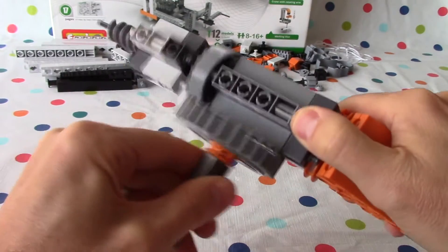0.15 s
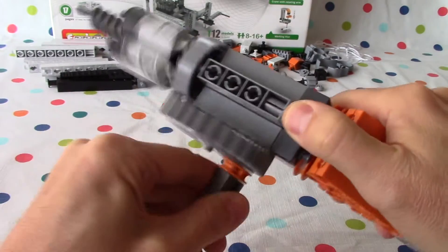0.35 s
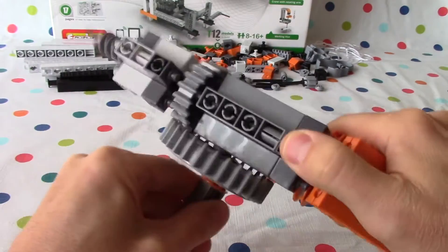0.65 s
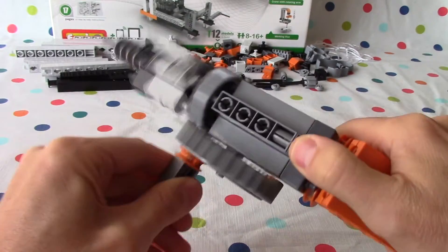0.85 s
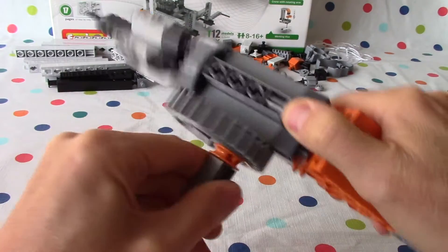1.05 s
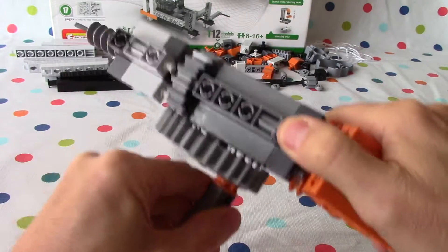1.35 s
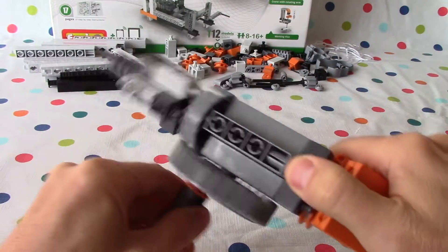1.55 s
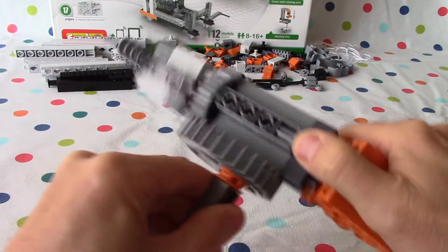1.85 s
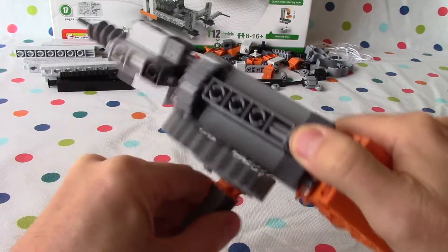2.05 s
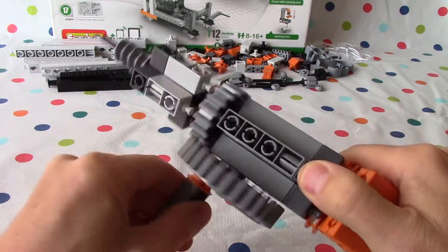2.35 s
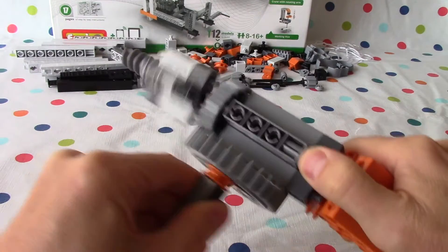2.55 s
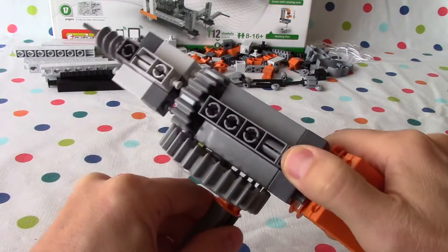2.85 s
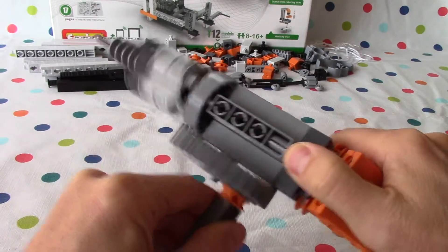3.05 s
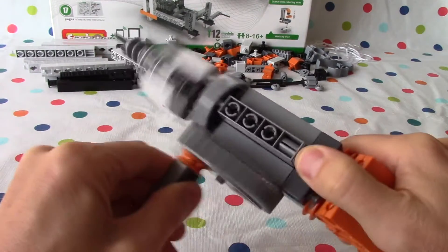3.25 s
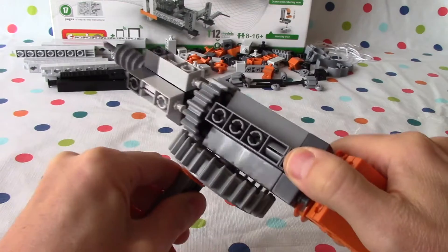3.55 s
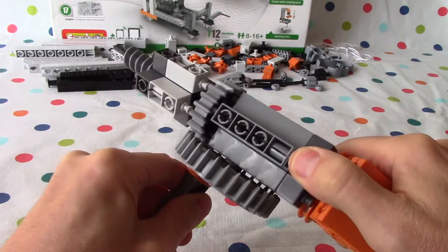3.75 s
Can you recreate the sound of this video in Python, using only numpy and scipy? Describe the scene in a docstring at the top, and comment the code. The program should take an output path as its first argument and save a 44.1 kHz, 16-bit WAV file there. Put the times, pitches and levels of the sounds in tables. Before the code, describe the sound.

Plastic toy gears click and rasp under a hand crank, close to the microphone in a small room. Light clicks start near 0.15 s, then dense, uneven clusters of bright, hollow snaps and short scrapes run from 0.55 to 2.75 s with brief gaps. After a short rest with a faint tick, another burst runs from 3.0 to 3.35 s. Quiet low hum remains, with a tiny high tick near 3.75 s.

```python
"""A hand turns the crank of a plastic toy gearbox in uneven strokes, close by in a small room.
Teeth rasp in runs of tiny impacts and sliding noise, and snap free with clicks of a few quick bounces.
Each contact rings the hollow plastic: a sharp edge, a fast-dying noise and a set of ringing tones.
While the gears rest, a small part ticks faintly in two high tones.
Beneath lie a low hum of shaped noise with a faint steady tone, and the room's short, dull answer."""
import sys
import numpy as np
from scipy import signal
from scipy.fft import rfft, irfft, next_fast_len
from scipy.io import wavfile
from scipy.ndimage import map_coordinates

SR = 44100
rng = np.random.default_rng(int(sys.argv[2]) if len(sys.argv) > 2 else 0)


def unload_wav(signal):
    """Save mono or channel-first audio to the path in sys.argv[1] as 16-bit WAV at rate SR, clipped to [-1, 1]."""
    wavfile.write(
        sys.argv[1],
        SR,
        np.round(np.clip(np.atleast_2d(signal).T, -1, 1) * 32767).astype(np.int16),
    )


N = 171990

# runs of teeth scraping: start [t/s], length [t/s], level [level/dB],
# bass shelf [level/dB], treble shelf [level/dB]
TOOTH_RASPS = [(0.142, 0.026, -46.5, -18.5, 7.5), (0.171, 0.028, -36, -30, 0), (0.262, 0.043, -44, 1, 0),
               (0.311, 0.018, -29, -7, 5), (0.346, 0.036, -31.5, -1, -1.5), (0.549, 0.04, -25.5, 8, 2),
               (0.675, 0.089, -37.5, 0, 3.5), (0.78, 0.043, -32, 0, 0.5), (0.833, 0.022, -29.5, -4, 1.5),
               (0.895, 0.074, -42, 1, 0), (0.947, 0.054, -36.5, -12, 1), (1.008, 0.052, -28.5, -14, -0.5),
               (1.087, 0.03, -32.5, -9.5, -2.5), (1.242, 0.035, -23.5, 1, 1), (1.411, 0.026, -33, -7, -5),
               (1.436, 0.037, -24, 12, 2.5), (1.478, 0.052, -30.5, 4.5, 3), (1.632, 0.017, -35.5, -23, 2),
               (1.657, 0.066, -40, -2, -3), (1.723, 0.018, -26, -18, 0.5), (1.78, 0.026, -29.5, -3, -1),
               (1.81, 0.12, -40, -15.5, 1.5), (1.845, 0.016, -28.5, -15, 2.5),
               (1.924, 0.053, -32.5, -10.5, -1), (1.984, 0.042, -28, 7, -2.5),
               (2.041, 0.061, -32.5, 8.5, -3), (2.211, 0.032, -36.5, 3.5, 1.5), (2.235, 0.031, -21, 8, 6),
               (2.275, 0.029, -30.5, 1, -0.5), (2.45, 0.15, -35, -13.5, -1), (2.597, 0.018, -27, -21, 4),
               (2.626, 0.083, -27.5, -7, 1), (2.724, 0.028, -30, 0, 1.5), (2.993, 0.029, -38, -5, 1.5),
               (3.016, 0.046, -26.5, -17, -1.5), (3.062, 0.059, -26.5, -30, 0),
               (3.132, 0.033, -30, -17.5, -2.5), (3.169, 0.023, -42.5, -5.5, 4),
               (3.239, 0.05, -32.5, -4, -2.5), (3.285, 0.03, -29, -3.5, -4), (3.316, 0.0274, -24.5, 3.5, 1)]
# a tooth snaps free and chatters in its play: start [t/s], level [level/dB], strongest resonance [f/Hz]
TOOTH_CLICKS = [(0.155, -35.5, 3760), (0.194, -39, 1500), (0.238, -36, 1480), (0.304, -31.5, 3600),
                (0.351, -28.5, 1810), (0.37, -26, 3080), (0.395, -28.5, 912), (0.538, -38.5, 3060),
                (0.561, -20, 3400), (0.571, -17.5, 1060), (0.587, -23, 1076), (0.641, -27.5, 2400),
                (0.682, -27.5, 3430), (0.693, -25.5, 980), (0.716, -23.5, 3500), (0.735, -34, 4100),
                (0.745, -21.5, 2350), (0.795, -20.5, 2420), (0.818, -30.5, 940), (0.87, -33, 1620),
                (0.931, -28.5, 3530), (0.96, -24, 2950), (0.982, -32, 960), (1.011, -21, 1600),
                (1.028, -22.5, 1610), (1.113, -27.5, 3000), (1.229, -40, 5540), (1.257, -16, 3360),
                (1.277, -24.5, 5900), (1.297, -35.5, 4250), (1.334, -38.5, 940), (1.415, -32, 3130),
                (1.438, -20, 2840), (1.471, -18.5, 5650), (1.51, -22, 2400), (1.558, -37, 3530),
                (1.581, -27, 5570), (1.687, -36.5, 1700), (1.728, -23, 2950), (1.745, -27.5, 2480),
                (1.781, -23, 6400), (1.86, -29, 1160), (1.903, -27, 1590), (1.943, -22, 4930),
                (1.96, -19.5, 3000), (1.993, -25, 3040), (2.014, -22.5, 730), (2.048, -22, 3070),
                (2.062, -25, 1110), (2.075, -19, 3300), (2.094, -23.5, 5700), (2.241, -20, 5800),
                (2.265, -15, 1810), (2.283, -25, 1630), (2.307, -25.5, 1860), (2.43, -29, 2840),
                (2.469, -30, 1330), (2.517, -26, 2900), (2.556, -24.5, 1850), (2.607, -25, 1700),
                (2.652, -19.5, 3220), (2.744, -23.5, 1124), (2.962, -47, 1710), (3.033, -24.5, 2380),
                (3.056, -24, 2150), (3.095, -30, 1560), (3.11, -28, 6800), (3.133, -23.5, 2420),
                (3.222, -26.5, 4800), (3.289, -26.5, 935), (3.322, -22, 5780), (3.339, -23.5, 2620),
                (3.432, -55, 1236)]

BASS_HZ, TREBLE_HZ = 606, 3900  # corners of the bass and treble shelves
RING_DB, RING_SCATTER_DB = -9, 0.5  # ringing tones against the crack; their scatter from spot to spot
SNAP_DB = -19.5  # the first sharp edge against the crack
DETUNE = 0.021  # random spread of the ringing tones from contact to contact, as a share of pitch
RESONANCE_DB, RESONANCE_WIDTH = 9.5, 0.053  # strongest resonance; half width as a share of its pitch
RIPPLE_DB, RIPPLE_PER_OCTAVE = 3, 4.415  # peaks and dips that differ from spot to spot
RING_SIZE = 4096  # samples in one contact

IMPACTS_PER_S, SIZE_SCATTER_DB = 300, 3  # typical rate within a rasp; scatter of the impact sizes
UNEVEN, SWELL_DB = .3, 1  # scatter of the gaps between impacts; a rasp grows as the load builds
SLIDE_DB = -8  # softer sliding friction against the impacts
WANDER = 0.17  # share by which the resonance strays from spot to spot within a rasp
ATTACK_S, RELEASE_S = .004, 0.0045  # fade in and fade out of a rasp

CHATTER_S, CHATTER_DB = .0013, -2.5  # average gap between the bounces of a click; change per bounce
CLICK_S = .005  # span over which a click's level counts

TICK_T60_S, TICK_UPPER = 0.021, 1.22  # time to fall by 60 dB; pitch ratio of the second tone
TICK_BODY_DB = -13  # plastic contact in a tick

HUM_DB, HUM_SIDE_DB = -58.5, -10.5  # mid and side together; side against mid
TONE_HZ, TONE_DB = 412, -66  # a faint steady tone in the hum
ROOM_DB, ROOM_SIDE_DB = -10, -18  # answer before dulling; side against mid
ROOM_DELAY_S, ROOM_DULL_HZ = .005, 5900
PORT_SIDE_DB = -37.5  # how much the two microphone ports differ
TOP_HZ = 15850  # upper limit of the sound


def amp(db):
    """Turn decibels into a gain."""
    return 10 ** (np.asarray(db) / 20)


def unit(x):
    """Scale to energy 1, the sum of the squares."""
    return x / np.sqrt(np.sum(x ** 2) + 1e-20)


def along(points, hz):
    """Read a curve of (f/Hz, value) points on a logarithmic frequency axis."""
    f, value = np.transpose(points)
    return np.interp(np.log(hz + 1), np.log(f + 1), value)


def filtered(x, gain):
    """Multiply the spectrum of x by a gain that depends on frequency."""
    size = next_fast_len(N + SR // 2)
    spectrum = rfft(x, size) * gain(np.fft.rfftfreq(size, 1 / SR))
    return irfft(spectrum, size)[..., :N]


def causal(db):
    """Make the minimum-phase filter with these gains, so its energy comes as early as it can."""
    cepstrum = irfft(np.log(amp(db)))
    half = len(cepstrum) // 2
    cepstrum[1:half] *= 2
    cepstrum[half + 1:] = 0
    return np.exp(rfft(cepstrum))


def dying_noise(t60s, size):
    """Make noise of energy 1 in which each frequency takes its own time to fall by 60 dB."""
    hz, t, cells = signal.stft(rng.standard_normal(size), SR, nperseg=64)
    decay = 1000. ** (-t / along(t60s, hz)[:, None])
    return unit(signal.istft(cells * decay, SR)[1][:size])


def add(track, s, sound):
    """Mix a sound into a track at time s."""
    part = track[round(s * SR):][:len(sound)]
    part += sound[:len(part)]


def hum():
    """Low room noise with a few resonances, as mid and side."""
    # general colour, scaled later: [f/Hz], noise per Hz [level/dB]
    hum_colour = [(30, -78), (174, -13), (328, -7.5), (740, -13.5), (1630, -18.5), (7000, -38),
                  (16000, -57)]
    # resonances on top: [f/Hz], width [f/Hz], rise above the rest [level/dB]
    hum_peaks = [(304.6, 32, 7.5), (920, 130, 7.5)]

    def colour(hz):
        peaks = sum(db / (1 + (2 * (hz - f) / width) ** 2) for f, width, db in hum_peaks)
        return amp(along(hum_colour, hz) + peaks)

    noise = filtered(rng.standard_normal((2, N)), colour) * amp([[0], [HUM_SIDE_DB]])
    return amp(HUM_DB) * np.sqrt(N) * unit(noise)


def contact(bass_db, treble_db, ring_hz):
    """One spot of the plastic struck once: an edge, a damped crack and ringing tones; energy 1."""
    # what gears and housing ring with: [f/Hz], relative level [level/dB], time to fall by 60 dB [t/s]
    plastic_modes = [(675, -5, 0.055), (995, 4, 0.049), (1738, 2.5, 0.033), (2745, -27, 0.016),
                     (3380, -2.5, 0.026), (4120, 4, 0.037), (4720, 3, 0.029), (5950, 10.5, 0.026),
                     (6780, 14, 0.013), (8600, 9, 0.008)]
    # colour of a contact: [f/Hz], relative level per Hz [level/dB]
    shell_colour = [(50, -65.5), (244, -21), (527, -11.5), (682, -3.5), (991, -2), (3340, -1), (5210, -8.5),
                    (8920, -8.5), (11800, -20), (16000, -28.5)]
    # dense, damped crack of a contact: [f/Hz], time to fall by 60 dB [t/s]
    crack_decay = [(300, 0.021), (1500, 0.019), (12000, 0.010)]
    t, hz = np.arange(RING_SIZE) / SR, np.fft.rfftfreq(RING_SIZE, 1 / SR)

    f, db, t60 = np.transpose(plastic_modes)[:, :, None]
    f = f * (1 + DETUNE * rng.uniform(-1.1, 1, f.shape))
    signs = rng.choice([-1, 1], f.shape)
    weights = signs * amp(db + RING_SCATTER_DB * rng.standard_normal(f.shape))
    ring = unit(np.sum(weights * amp(-60 * t / t60) * np.sin(2 * np.pi * f * t), axis=0))
    edge = t == 0  # a single sample
    blow = dying_noise(crack_decay, size=RING_SIZE) + amp(RING_DB) * ring + amp(SNAP_DB) * edge

    bass = bass_db / (1 + (hz / BASS_HZ) ** 4)
    treble = treble_db * (1 - 1 / (1 + (hz / TREBLE_HZ) ** 4))
    resonance = RESONANCE_DB / (1 + ((hz / ring_hz - 1) / RESONANCE_WIDTH) ** 2)
    ripple_place = RIPPLE_PER_OCTAVE * np.log2(1 + hz / BASS_HZ)
    ripple = RIPPLE_DB * map_coordinates(rng.standard_normal(size=64), [ripple_place])
    colour = along(shell_colour, hz) + bass + treble + resonance + ripple
    fade = 1 - (t / t[-1]) ** 2
    return unit(irfft(rfft(blow) * causal(colour)) * fade)


def resonance_at(s):
    """A rasp rings most at the resonance of the click nearest in time, as the same part rings."""
    return min(TOOTH_CLICKS, key=lambda row: abs(s - row[0]))[-1]


def rasp(s, length, shelves, count=128, channels=5):
    """Teeth stick and slip in a swelling run; the load rolls from one spot to the next; rms 1."""
    t = np.arange(SR // 4) / SR
    place = np.minimum(t / length, 1)  # 0 to 1 through the run
    fade_out = np.exp(-np.maximum(t - length, 0) / RELEASE_S)
    shape = np.minimum(t / ATTACK_S, 1) * amp(SWELL_DB * place) * fade_out

    gaps = np.exp(UNEVEN * rng.standard_normal(count)) * SR / IMPACTS_PER_S
    at = np.cumsum(gaps).astype(int)
    sizes = amp(SIZE_SCATTER_DB * rng.standard_normal(count))
    impacts = np.bincount(at, sizes, len(t))[:len(t)]
    sliding = rng.standard_normal(len(t))
    force = unit(impacts * shape) + amp(SLIDE_DB) * unit(sliding * shape)

    # each channel is one spot; neighbouring spots crossfade
    distance = abs(place * (channels - 1) - np.arange(channels)[:, None])
    load = np.sqrt(np.maximum(1 - distance, 0))
    pitches = [resonance_at(when) for when in np.linspace(s, s + length, channels)]
    pitches = pitches * np.exp(WANDER * rng.standard_normal(channels))
    spots = np.array([contact(*shelves, hz) for hz in pitches])
    sound = signal.fftconvolve(load * force, spots, axes=1).sum(axis=0)
    return unit(sound) * np.sqrt(length * SR)


def shelves_at(s):
    """A click has the bass and treble of the nearest rasp, as the same teeth are in mesh."""
    return min(TOOTH_RASPS, key=lambda row: abs(s - row[0] - row[1] / 2) - row[1] / 2)[3:]


def click(colour, count=4):
    """A tooth lands and bounces a few times within milliseconds; rms 1 over CLICK_S."""
    out, s = np.zeros(RING_SIZE), 0
    for bounce in range(count):
        add(out, s, amp(bounce * CHATTER_DB) * contact(*colour))
        s += CHATTER_S * rng.uniform(.5, 1.5)
    return unit(out) * np.sqrt(CLICK_S * SR)


def gears():
    """The teeth scrape in rasps and snap free in clicks, all mixed into one track."""
    out = np.zeros(N)
    for s, length, db, *shelves in TOOTH_RASPS:
        add(out, s - ATTACK_S / 2, amp(db) * rasp(s, length, shelves))
    for s, db, hz in TOOTH_CLICKS:
        add(out, s, amp(db) * click((*shelves_at(s), hz)))
    return out


def room(x, count=26):
    """The room's short, dull answer, as mid and side, made of noise that dies away."""
    # how fast the answer dies: [f/Hz], time to fall by 60 dB [t/s]
    room_decay = [(200, 0.095), (1000, 0.16), (6000, 0.13)]
    wet, hop = np.zeros((2, N)), N // count
    window = np.sin(np.linspace(0, np.pi, 2 * hop))
    # overlapping pieces each get a fresh random answer, so no fixed colour stands out
    for start in range(0, N - 2 * hop + 1, hop):
        part = x[start:start + 2 * hop] * window
        for track, db in zip(wet, (0, ROOM_SIDE_DB)):
            answer = signal.fftconvolve(part, dying_noise(room_decay, size=SR // 3))
            add(track, start / SR + ROOM_DELAY_S, amp(db) * answer)
    return amp(ROOM_DB) * filtered(wet, lambda hz: 1 / np.hypot(1, hz / ROOM_DULL_HZ))


def ticks():
    """A small part settles with a thin, high ring of two tones and a plastic contact."""
    # ticks while the gears rest: start [t/s], level of each tone at its start [level/dB], pitch [f/Hz]
    small_ticks = [(2.942, -47, 3390), (3.749, -47.5, 5520)]
    out, t = np.zeros(N), np.arange(RING_SIZE) / SR
    for s, db, hz in small_ticks:
        tones = np.sin(2 * np.pi * hz * t) + np.sin(2 * np.pi * hz * TICK_UPPER * t)
        ring = amp(-60 * t / TICK_T60_S) * tones
        body = amp(TICK_BODY_DB) * np.sqrt(CLICK_S * SR) * contact(0, 0, hz)
        add(out, s, amp(db) * (ring + body))
    return out


def scene():
    """The toy sits straight ahead; the room and the microphone ports add a little width."""
    toy = gears() + ticks()
    mid, side = room(toy) + hum()
    tone = amp(TONE_DB) * np.sqrt(2) * np.sin(2 * np.pi * TONE_HZ * np.arange(N) / SR)
    mid = mid + toy + tone
    port_difference = unit(np.diff(rng.standard_normal(size=24)))
    side = side + amp(PORT_SIDE_DB) * signal.fftconvolve(toy, port_difference)[:N]
    return np.array([mid + side, mid - side])  # left, right


def record(dry):
    """A very steep filter leaves almost nothing above the upper limit."""
    return filtered(dry, lambda hz: 1 / np.hypot(1, (hz / TOP_HZ) ** 150))


dry = scene()
out = record(dry)
unload_wav(out)
```